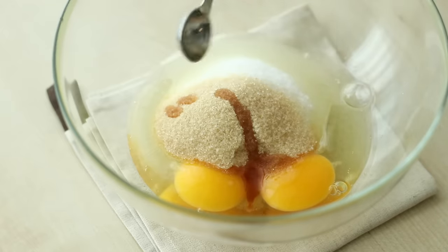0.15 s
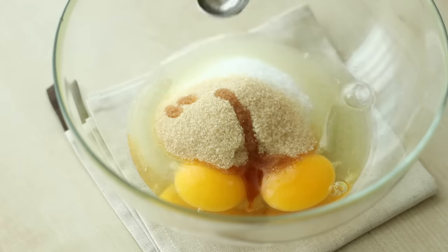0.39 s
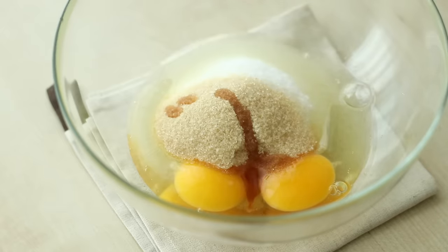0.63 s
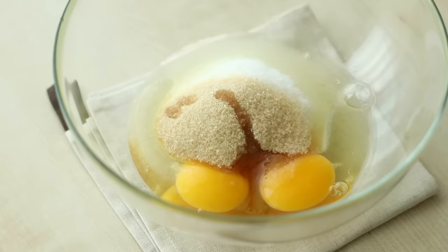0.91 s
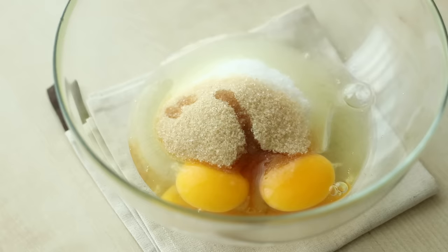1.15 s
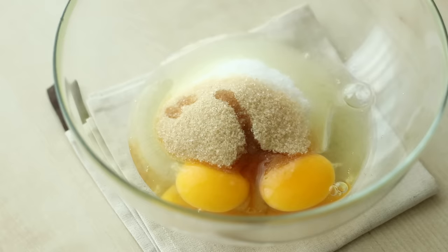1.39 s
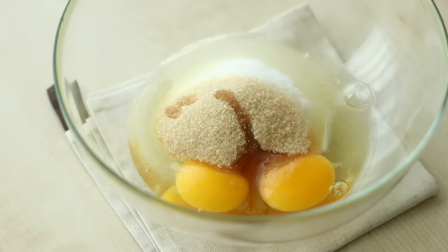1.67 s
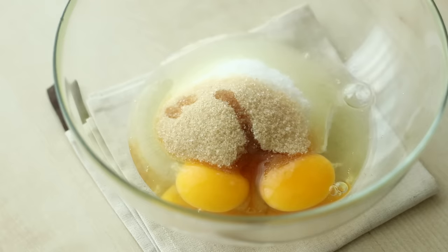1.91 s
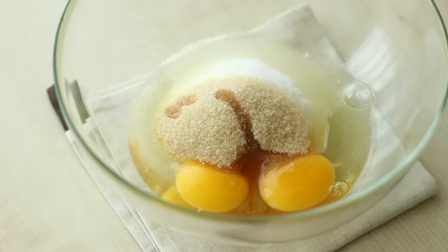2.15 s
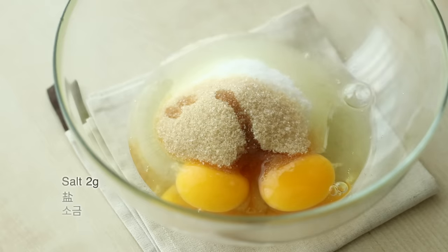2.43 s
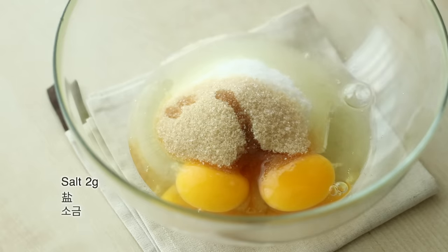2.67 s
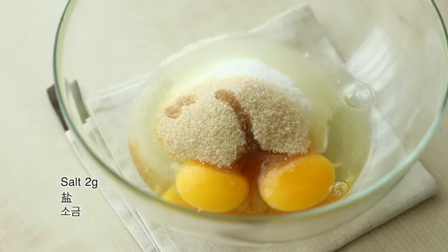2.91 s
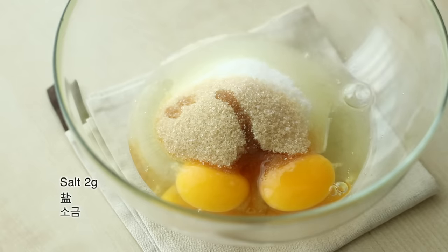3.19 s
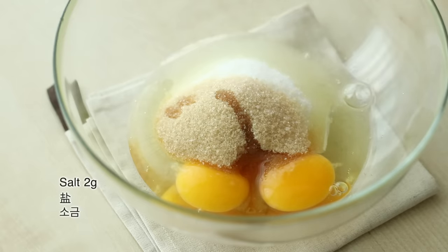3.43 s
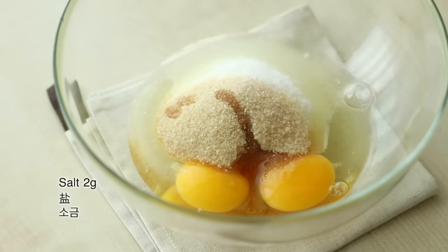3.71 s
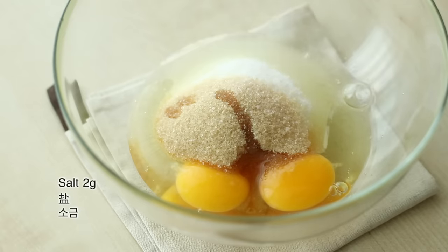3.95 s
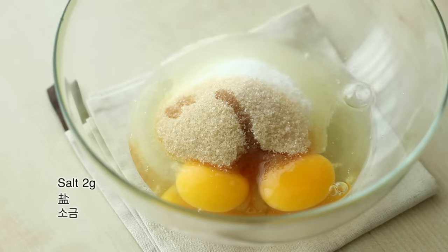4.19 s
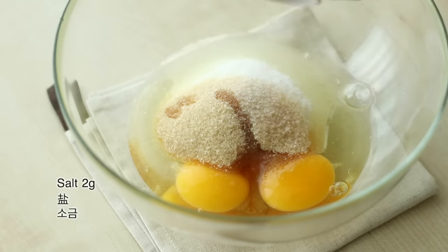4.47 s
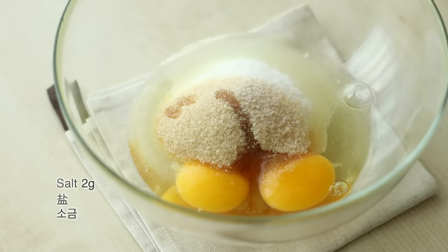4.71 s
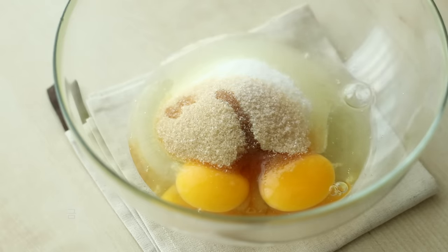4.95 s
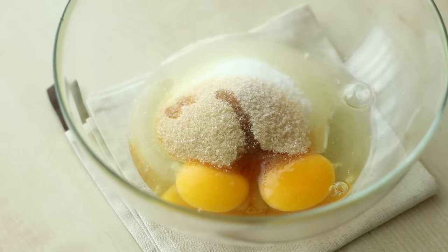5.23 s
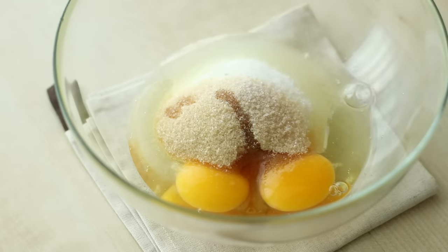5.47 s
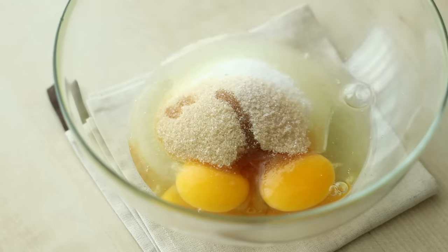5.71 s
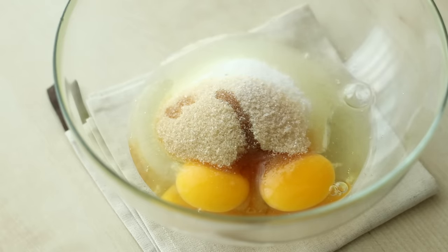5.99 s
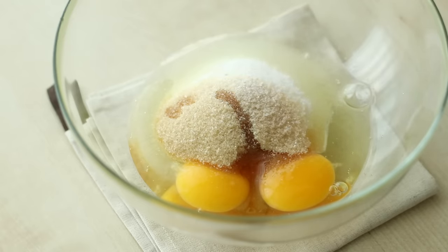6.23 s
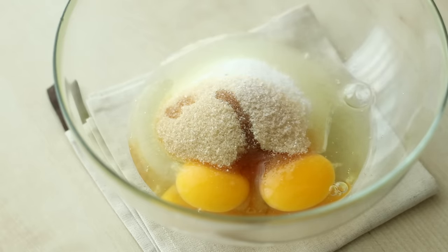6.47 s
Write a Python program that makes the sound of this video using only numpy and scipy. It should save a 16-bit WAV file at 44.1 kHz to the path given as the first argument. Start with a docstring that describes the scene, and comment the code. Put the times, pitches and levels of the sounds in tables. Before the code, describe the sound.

A hand-held salt mill rattles, then is twisted about a dozen times with crackling crunches and fine salt trickling after, close up in a quiet kitchen.

```python
"""Low room air and a faint hiss run throughout, in a quiet kitchen with a short room tail.
First a hand-held salt mill is picked up with a soft scuff and tipped, so its loose crystals rattle.
Then it is twisted a dozen times: clumps of tiny noise puffs make each crunch, and snaps with
splinters of noise make the louder cracks. Dull housing knocks are decaying low tones.
After the twists fine salt trickles and ticks: sparse noise puffs coloured by the chamber."""
import sys
import numpy as np
from scipy import signal
from scipy.io import wavfile
from scipy.ndimage import uniform_filter1d

SR = 44100
rng = np.random.default_rng(int(sys.argv[2]) if len(sys.argv) > 2 else 0)


def generate_wav(signal):
    """Clip the signal to [-1, 1] and save it as 16-bit WAV at the path in sys.argv[1]."""
    frames = np.transpose(np.atleast_2d(signal))
    scaled = np.clip(frames, -1, 1) * 32767
    pcm = np.round(scaled).astype(np.int16)
    wavfile.write(sys.argv[1], SR, pcm)


def natural_amplitude(level_db):
    """Convert a level in decibels to a linear amplitude factor, elementwise."""
    exponent = np.asarray(level_db, float) / 20
    return 10 ** exponent


N = 291501  # length in samples

# Low room air. Each row: frequency in Hz, relative level in dB per Hz.
AIR_SPECTRUM = [(25, -4), (180, -11), (245, 1), (300, -17.5), (360, -4.5), (460, -2), (560, -6.5),
                (700, -7), (1100, -8.5), (2000, -15), (5000, -23)]
# Slow swell of the air; only changes from the first row count. Each row: time in seconds, level in dB.
AIR_SWELL = [(0.0, -53), (0.53, -51), (0.75, -49.5), (0.95, -54.5), (1.35, -55), (2.0, -55.5), (6.61, -52)]
# How alike the air is on both sides. Each row: frequency in Hz, left-right likeness (1 is identical).
AIR_LIKENESS = [(60, 0.86), (300, 0.94), (900, 0.97), (2500, 0.95)]
# Colour of the hiss. Each row: frequency in Hz, relative level in dB.
HISS_SPECTRUM = [(1180, -33), (2000, -5), (3200, -1.5), (5000, -1.5), (13800, -5.5), (15100, 0),
                 (16000, -4)]
AIR_DB, HISS_DB = -57, -63  # air over its first half second, hiss throughout

# How fast the room tail dies. Each row: frequency in Hz, time to fall 60 dB in seconds.
ROOM_DECAY = [(200, 0.76), (1000, 0.55), (4000, 0.41), (12000, 0.5)]

# The mill leaves the table. One row: start in seconds, level in dB, time to fall 60 dB in seconds,
# middle frequency in Hz.
LIFT_SCUFF = (.556, -55, .3, 1200)

# Dull knocks of the housing in the hand. Each row: start in seconds, peak level in dB.
KNOCKS = [(1.61, -21), (1.691, -20), (1.784, -28.5), (2.006, -25), (3.769, -47), (4.598, -17.5),
          (4.854, -31), (5.022, -29)]
# Low tones of a knock, before small random changes. Each row: frequency in Hz, relative level in dB,
# time to fall 60 dB in seconds.
KNOCK_TONES = [(220, -6.5, .05), (347, 3, 0.057), (468, -2, 0.055), (770, -5, .03)]

# The chamber's colour on loose salt. Each row: frequency in Hz, relative level in dB per Hz.
CHAMBER_SPECTRUM = [(300, -26), (1200, -16), (1800, -9), (2600, -12), (3600, -6), (5300, -8), (6100, -3),
                    (6800, 0), (7500, -4), (8100, -10), (11200, -7), (12800, -12), (15600, -14)]
# Loose salt rattles down as the mill is tipped. Each row: time in seconds, level in dB.
TIPPING = [(.77, -64), (.815, -49), (.99, -47.5), (1.07, -40), (1.14, -40.5), (1.23, -40.5), (1.29, -47.5),
           (1.37, -51), (1.41, -64)]
# Salt trickles back after the twists. Each row: start in seconds, length in seconds,
# level at first in dB, level at last in dB.
TRICKLES = [(1.74, 0.13, -38, -37), (1.904, 0.06, -53, -58), (2.134, 0.18, -33.5, -59),
            (2.563, 0.1, -45, -49), (2.985, 0.15, -41, -54.5), (3.404, .14, -45, -50),
            (3.722, .06, -42.5, -49), (3.874, 0.22, -44.5, -58), (4.316, 0.13, -44.5, -44),
            (4.753, .11, -49, -38.5), (4.899, 0.033, -43, -57), (5.156, .15, -41, -49.5),
            (5.573, 0.15, -47, -51), (5.988, 0.16, -46, -47), (6.402, .14, -44.5, -52.5)]
SETTLE_S, SETTLE_DB = 0.071, -25.5  # the end of a trickle: how long it dies away, how far it falls
STIR_DB = -61  # faint stir of salt in the hand
STIR_S, STIR_RISE_DB = 0.046, 12.5  # the salt shifts just before the burrs catch

# Colour of the mill under load. Each row: frequency in Hz, relative level in dB per Hz.
BODY_SPECTRUM = [(100, -26.5), (315, -1), (558, -15.5), (820, -4.5), (1310, -1.5), (2400, -3), (3000, 4),
                 (4200, -3), (6300, -6.5), (7500, -7.5), (10000, -10.5), (15600, -15), (16200, -43)]
# Short rings of the housing. Each row: frequency in Hz, width in Hz (wider dies faster),
# relative level in dB before random changes.
HOUSING_RINGS = [(332, 310, -1), (849, 132, 4.5), (1320, 47, -4.5), (1820, 97, -31), (2470, 320, 0.5),
                 (3160, 200, 6.5), (3260, 1900, -2), (4520, 3000, -9.5), (6370, 520, -0.5)]
# The burrs bite one to four times a twist. Each row: start in seconds, time to peak in seconds,
# length in seconds, peak force in dB, force at release in dB.
BITES = [(1.465, 0.027, 0.072, -26.5, -30.5), (1.569, .005, 0.017, -29, -42),
         (1.597, 0.014, .062, -18.5, -33.5), (1.689, 0.0035, .048, -17, -27.5),
         (1.99, 0.011, 0.012, -46, -51), (2.004, 0.016, 0.066, -17, -23.5),
         (2.102, 0.011, 0.031, -20.5, -18.5), (2.443, .022, 0.066, -16.5, -30.5),
         (2.508, 0.018, 0.053, -22.5, -27.5), (2.844, 0.05, 0.086, -18, -24.5),
         (2.931, 0.023, 0.041, -21.5, -20), (3.282, 0.02, 0.066, -13, -27.5),
         (3.368, 0.017, .02, -22.5, -20), (3.801, 0.0036, 0.078, -16.5, -34.5),
         (4.183, 0.021, 0.066, -17.5, -24.5), (4.278, 0.013, 0.029, -18.5, -30.5),
         (4.591, 0.025, 0.036, -16.5, -23.5), (4.66, 0.0043, 0.044, -19, -26),
         (4.726, 0.01, 0.031, -24, -31.5), (4.846, .012, 0.027, -38, -37.5), (5.021, 0.01, .034, -30, -26),
         (5.056, 0.013, 0.1, -17.5, -30.5), (5.455, 0.018, 0.072, -15, -27),
         (5.535, 0.013, 0.034, -22.5, -28), (5.852, 0.064, 0.13, -21, -22.5),
         (6.29, 0.024, 0.12, -19.5, -29.5)]
# A bite catches below its peak, builds, sags, then lets go.
ATTACK_S, CATCH_DB, RELEASE_S, RELEASE_DB = 0.0048, -15.5, 0.0086, -26
# Single crystals breaking or knocking. Each row: start in seconds, peak in the housing (middle part)
# in dB, peak in the treble in dB.
CRACKS = [(0.8034, -41, -34), (0.9303, -56, -17.5), (0.958, -55.5, -19), (1.0227, -32.5, -14),
          (1.0588, -43, -14), (1.0827, -33, -14), (1.098, -24, -17), (1.1156, -37, -15), (1.198, -21, -17),
          (1.2218, -22, -8.5), (1.2513, -34, -12), (1.3143, -31, -23), (1.4581, -36, -19),
          (1.486, -14, -11.5), (1.5068, -9, -21), (1.5727, -8.5, -12), (1.6065, -5, -15), (1.671, -19, -14),
          (1.691, 1, -14), (1.7066, -3, -25), (1.7258, 1.5, -24), (1.7338, -21, -8.5), (1.7859, -7, -16.5),
          (1.8801, -20, -15.5), (2.0239, 0, -15), (2.1064, -9.5, -17.5), (2.2309, -33, -23),
          (2.418, -52, -29.5), (2.4436, -14, -17), (2.4543, -5, -7.5), (2.482, -5, -15), (2.5331, -5, -17),
          (2.6265, -22, -23), (2.6503, -38, -24), (2.6619, -14, -12.5), (2.8245, -25, -26.5),
          (2.8736, -16, -4.5), (2.968, -11.5, -13.5), (3.053, -35, -24), (3.088, -38, -21),
          (3.1792, -44.5, -30), (3.2831, -9, -13), (3.3136, 0.5, -11.5), (3.3766, -5, -6.5),
          (3.3865, -11, -13), (3.5185, -36, -20.5), (3.636, -37, -41), (3.7229, -10.5, -12),
          (3.8, -1, -10.5), (3.859, -17.5, -31), (3.9171, -19.5, -21), (4.2075, -9, -9), (4.2224, -1, -3.5),
          (4.2392, -1.5, -21), (4.2823, -11.5, -14.5), (4.3706, -24.5, -14.5), (4.6011, -4, -10),
          (4.6285, -4, -7.5), (4.6618, -3, -11), (4.674, -3, -6), (4.8083, -25, -26), (4.825, -36, -29),
          (4.8375, -18.5, -18), (4.9604, -31, -19), (5.058, -4.5, -22), (5.149, -11, -25),
          (5.2138, -27, -22), (5.2552, -19.5, -14.5), (5.488, -9, -34), (5.5531, -7.5, -15),
          (5.6591, -32, -20), (5.7518, -45.5, -24.5), (5.766, -37, -33), (5.8521, -22.5, -25),
          (5.8653, -14, -18), (5.8846, -5.5, -11.5), (5.919, -13, -2), (5.9367, -6.5, -10),
          (6.039, -21.5, -21.5), (6.1253, -35, -21), (6.3178, -6, -26), (6.3332, -5, -26), (6.47, -29, -17),
          (6.4837, -20, -21), (6.498, -21.5, -21), (6.521, -30, -30)]
STRAY_DB = 9  # lesser cracks, this far over the force of their bite
STRAY_TREBLE_DB, STRAY_SPREAD_DB = -10, 5  # their treble against their housing part; random range either way

LOW_HZ, HIGH_HZ = 800, 5000  # where bass, middle and treble meet


def evened(x):
    """Scale a sound to an average power of one."""
    return x / np.sqrt(np.mean(x ** 2) + 1e-20)


def read(points, hz):
    """Read a frequency table between its rows, on a logarithmic frequency scale."""
    f, value = np.transpose(points)
    return np.interp(np.log(hz + 1), np.log(f + 1), value)


def coloured(x, points, size=2048):
    """Filter with the given spectrum, never sounding early: the phase follows from the log gain."""
    hz = abs(np.fft.fftfreq(size, 1 / SR))
    log_gain = np.log(natural_amplitude(np.maximum(read(points, hz), -100)))
    taps = np.fft.ifft(np.exp(np.conj(signal.hilbert(log_gain)))).real[:size // 2]
    return signal.oaconvolve(x, taps)[:len(x)]


def filtered(x, order, hz, kind):
    """A Butterworth filter: smooth, without ripples in what it passes."""
    return signal.sosfilt(signal.butter(order, hz, kind, fs=SR, output="sos"), x)


def thirds(x):
    """Bass, middle and treble; the middle is turned over so that the parts join without a dip."""
    bass = filtered(x, 2, LOW_HZ, "low")
    middle = filtered(x, 2, [LOW_HZ, HIGH_HZ], "band")
    treble = filtered(x, 2, HIGH_HZ, "high")
    return bass, -middle, treble


def patch_field(shape):
    """Random values smoothed over 6 frequency steps and 16 time steps."""
    field = rng.standard_normal(shape[::-1]).T
    field = uniform_filter1d(field, size=6, axis=0)
    return evened(uniform_filter1d(field, size=16, axis=1))


def patchy(x, patch_db):
    """The colour wanders at random in patches of about a kilohertz by fifty milliseconds."""
    z = signal.stft(x, nperseg=256)[2]
    return signal.istft(z * natural_amplitude(patch_db * patch_field(z.shape)), nperseg=256)[1][:len(x)]


def played(tables, sound, fade=0.0027):
    """Each table of times and levels lets a stretch of the sound through, with short fades in seconds."""
    out = np.zeros(N)
    for rows in tables:
        s, db = np.transpose(rows)
        at = np.arange(round(s[0] * SR), min(round(s[-1] * SR), N))
        edges = signal.windows.tukey(len(at), min(2 * fade * SR / len(at), 1))
        out[at] += natural_amplitude(np.interp(at / SR, s, db)) * edges * sound[at]
    return out


def grains(per_s, spread_db, t60, count=30, pitched=0.59):
    """Tiny fractures: random clicks of uneven size, each a puff of noise with its own pitch region."""
    happens = rng.random(N) < per_s / SR
    size = natural_amplitude(spread_db * np.minimum(rng.exponential(1, N), 4)) * happens
    kind = rng.integers(0, count, N)
    t = np.arange(600) / SR
    noise = rng.standard_normal((count, len(t)))
    centres = np.geomspace(500, 15000, count)
    bands = np.array([filtered(row, 1, [hz / 1.7, hz * 1.33], "band") for hz, row in zip(centres, noise)])
    puffs = ((1 - pitched) * noise + 2 * pitched * bands) * natural_amplitude(-60 * t / t60)
    return evened(sum(signal.oaconvolve(size * (kind == k), puffs[k])[:N] for k in range(count)))


def background():
    """Low room air, much alike on both sides and slowly swelling, over unrelated hiss."""
    frames, hz = N // 256 + 5, np.fft.rfftfreq(1024, 1 / SR)
    a, b, c, d = rng.standard_normal((4, len(hz), frames))
    s, db = np.transpose(AIR_SWELL)
    swell_db = np.interp(np.arange(frames) * 256 / SR, s, db - db[0])
    same = np.clip(read(AIR_LIKENESS, hz), -1, 1)[:, None]
    left = a + 1j * b
    right = same * left + np.sqrt(1 - same ** 2) * (c + 1j * d)
    patches_db = 2.2 * patch_field((len(hz), frames))
    z = np.array([left, right]) * natural_amplitude(read(AIR_SPECTRUM, hz)[:, None] + patches_db + swell_db)
    air = signal.istft(z, nperseg=1024, noverlap=768)[1][:, :N]
    air = air / np.std(air[:, :SR // 2])
    hiss = np.array([coloured(side, HISS_SPECTRUM) for side in rng.standard_normal((2, N))])
    return natural_amplitude(AIR_DB) * air + natural_amplitude(HISS_DB) * evened(hiss)


def kitchen(x, turns_per_s=7):
    """Sparse echoes, each band dying at its own speed; three random tails fade in steady rotation."""
    taps = np.zeros((3, SR // 2))
    slots = np.arange(100, SR // 2 - 20, 20)
    at = slots + rng.integers(0, 20, (3, len(slots)))  # one echo somewhere in every 20 samples
    np.put_along_axis(taps, at, rng.choice([-1., 1.], at.shape), 1)
    hz, t, z = signal.stft(taps, SR, nperseg=256)
    t60 = np.maximum(read(ROOM_DECAY, hz), .03)[:, None]
    tails = signal.istft(z * natural_amplitude(-60 * t / t60), SR, nperseg=256)[1]
    # the three tails fade into one another, so that no fixed tail leaves tones of its own
    turn = np.cos(2 * np.pi * (turns_per_s * np.arange(N) / SR + np.arange(3)[:, None] / 3))
    return signal.fftconvolve(x * turn, tails / np.linalg.norm(tails[0]), axes=1)[:, :N].sum(0)


def lift():
    """A soft dull scuff as the mill is picked up: a band of noise that dies away."""
    s, db, t60, hz = LIFT_SCUFF
    t = np.arange(N) / SR - s
    scuff = filtered(rng.standard_normal(N), 1, [hz / 2, hz * 2], "band")
    return natural_amplitude(db - 60 * np.maximum(t, 0) / t60) * (t > 0) * evened(scuff)


def knocks(rise=0.0064):
    """A soft blow, rising in seconds, rings the housing's low tones, a little different each time."""
    t, out = np.arange(6000) / SR, np.zeros(N + 6000)
    all_draws = rng.standard_normal((len(KNOCKS), len(KNOCK_TONES), 2))
    for (s, peak_db), draws in zip(KNOCKS, all_draws):
        ring = np.zeros(len(t))
        for (hz, db, t60), (a, b) in zip(KNOCK_TONES, draws):
            tone = np.sin(2 * np.pi * hz * (1 + 0.051 * b) * t)
            ring += natural_amplitude(db + 3.7 * a - 60 * t / t60) * tone
        ring *= np.minimum(t / rise, 1)
        out[round(s * SR):][:len(t)] += natural_amplitude(peak_db) * ring / abs(ring).max()
    return out[:N]


def sliding_salt():
    """A fine hiss of small crystals with scattered ticks, coloured by the chamber."""
    fine = grains(5000, spread_db=5.0, t60=0.0073)
    ticks = grains(200, spread_db=4.5, t60=.006, pitched=1.0)
    rattle = coloured(fine + 0.54 * ticks, CHAMBER_SPECTRUM)
    rattle = patchy(rattle, patch_db=3)
    in_band = filtered(rattle, 2, [5500, 8000], "band")  # table levels refer to this band
    trickles = [[(s, db), (s + length, end_db), (s + length + SETTLE_S, end_db + SETTLE_DB)]
                for s, length, db, end_db in TRICKLES]
    stirs = [[(s - STIR_S, STIR_DB), (s + 0.028, STIR_DB + STIR_RISE_DB)] for s, *_ in BITES]
    held = [(TIPPING[-1][0], STIR_DB), (N / SR, STIR_DB)]
    return played([TIPPING, held] + trickles + stirs, rattle / np.std(in_band))


def mill_body(x, ring_change_db, ring_share=0.35):
    """The force sounds through the housing and its short rings, each ring louder or softer by chance."""
    t = np.arange(1500) / SR
    rings = 0
    for (hz, width, db), change_db in zip(HOUSING_RINGS, ring_change_db):
        ring = width * np.exp(-np.pi * width * t) * np.sin(2 * np.pi * hz * t)
        rings = rings + natural_amplitude(db + change_db) * signal.oaconvolve(x, ring)[:len(x)]
    return (1 - ring_share) * evened(coloured(x, BODY_SPECTRUM)) + ring_share * evened(rings)


def force_tables():
    """The shape that all bites share: catch, build to the peak, sag, let go."""
    tables = []
    for s, rise, length, db, end_db in BITES:
        release = s + max(length, rise + .001)
        catch_db = db + CATCH_DB * min(rise / 0.021, 1)  # a quick bite catches nearer its peak
        tables.append([(s - ATTACK_S, db - 41), (s, catch_db), (s + rise, db), (release, end_db),
                       (release + RELEASE_S, end_db + RELEASE_DB)])
    return tables


def stray_cracks(count=2):
    """Rows of lesser cracks at chance moments of each bite, their strength following its force."""
    rows = []
    for table, draws in zip(force_tables(), rng.random((len(BITES), count, 3))):
        s, db = np.transpose(table)
        for place, size, bright in draws:
            at = s[1] + place * (s[3] - s[1])
            body_db = np.interp(at, s, db) + STRAY_DB + STRAY_SPREAD_DB * (2 * size - 1)
            treble_db = body_db + STRAY_TREBLE_DB + STRAY_SPREAD_DB * (2 * bright - 1)
            rows.append((at, body_db, treble_db))
    return rows


def cracks(sharp=0.85, t60=0.0056, thin=0.59, bass_db=-14, ring_spread_db=4):
    """One snap and a splinter of noise a crystal: dull ones ring the housing, bright ones the chamber."""
    size, out = 2000, np.zeros(N + 2000)
    t, rows = np.arange(size) / SR, CRACKS + stray_cracks()
    draws = rng.standard_normal((len(rows), size + len(HOUSING_RINGS)))
    for (s, body_db, treble_db), noise in zip(rows, draws):
        force = noise[:size] * natural_amplitude(-60 * t / t60)
        force = signal.lfilter([1], [1, -.45 * np.tanh(noise[1])], force)  # some break duller, some brighter
        force[0] += sharp * np.sign(noise[0])  # the snap
        loose = treble_db > body_db - 3
        if loose:
            sound = coloured(signal.lfilter([1, -thin], [1, -.3], force), CHAMBER_SPECTRUM)
        else:
            sound = mill_body(force, ring_spread_db * noise[size:])
        bass, middle, treble = (part / abs(part).max() for part in thirds(sound))
        deep = 0 if loose else natural_amplitude(bass_db)
        out[round(s * SR):][:size] += natural_amplitude(body_db) * (middle + deep * bass) + natural_amplitude(treble_db) * treble
    return out[:N]


def crunch(bass_db=-15, treble_db=-7, ring_spread_db=5):
    """Dense fractures between the burrs, in clumps, following the force of each twist."""
    clumps = natural_amplitude(1.95 * evened(uniform_filter1d(rng.standard_normal(N), size=250)))
    force = evened(clumps * grains(6000, spread_db=2.8, t60=.005, pitched=.8))
    wander = uniform_filter1d(rng.standard_normal((len(HOUSING_RINGS), N)), size=3000, axis=1)
    sound = patchy(mill_body(force, ring_spread_db * evened(wander)), patch_db=2)
    bass, middle, treble = map(evened, thirds(sound))
    mix = middle + natural_amplitude(bass_db) * bass + natural_amplitude(treble_db) * treble
    return played(force_tables(), mix, fade=0.0031)


def scene():
    """The mill's sounds in stereo, with the room tail and the background."""
    mill = lift() + knocks() + sliding_salt() + cracks() + crunch()
    mill = filtered(mill, 3, 170, "high")  # the mill's sounds carry no deep bass
    # a faint, treble-heavy, slightly delayed copy, opposite in sign on the two sides
    thin_copy = np.roll(signal.lfilter([1, -.7], [1], mill), 40)
    wide = natural_amplitude(-40) * np.array([[1], [-1]]) * thin_copy
    return mill + wide + natural_amplitude(-16) * kitchen(mill) + background()


def roll_off(x):
    """The treble ends steeply here."""
    return signal.sosfilt(signal.butter(12, 16590, fs=SR, output="sos"), x)


def record(dry):
    """Peaks are cut flat just under full scale; then the top of the treble is filtered away."""
    edge = signal.firwin(255, 15900, window=("kaiser", 8), fs=SR)  # low-pass at 15900 Hz
    limited = np.clip(dry, -.93, .93)
    finished = signal.oaconvolve(limited, edge[None], "same")
    return roll_off(finished)


dry = scene()
out = record(dry)
generate_wav(out)
```